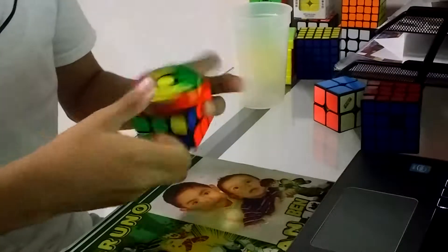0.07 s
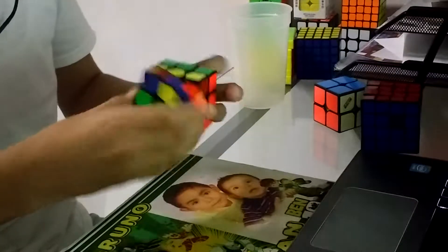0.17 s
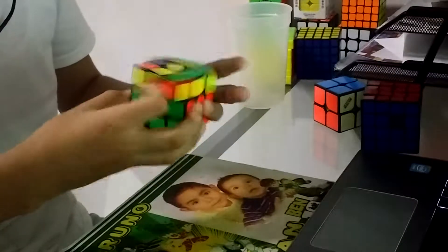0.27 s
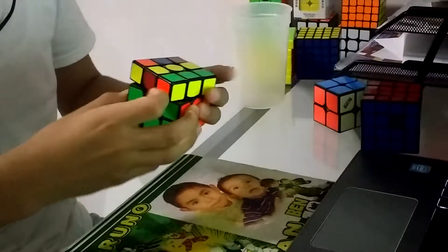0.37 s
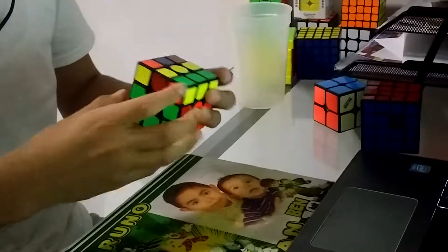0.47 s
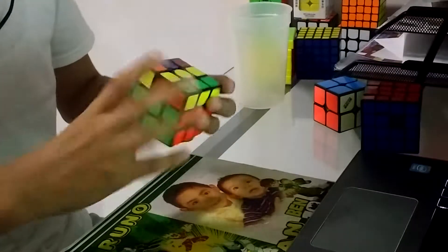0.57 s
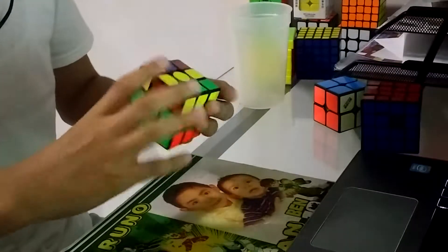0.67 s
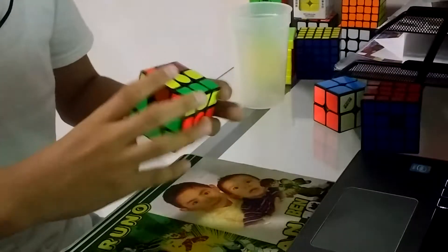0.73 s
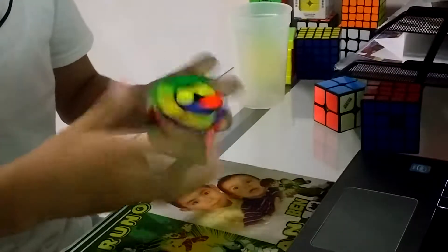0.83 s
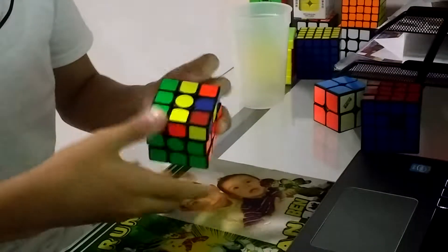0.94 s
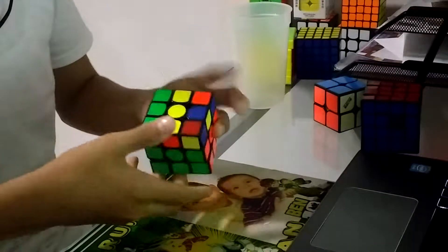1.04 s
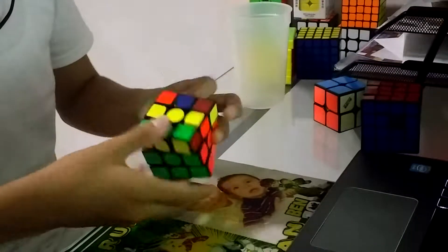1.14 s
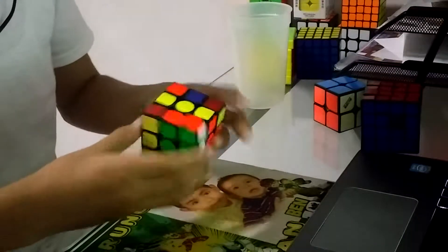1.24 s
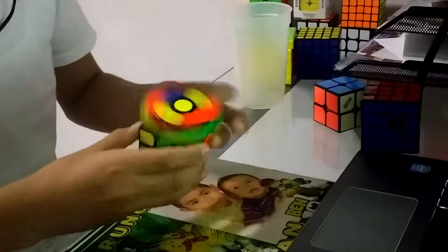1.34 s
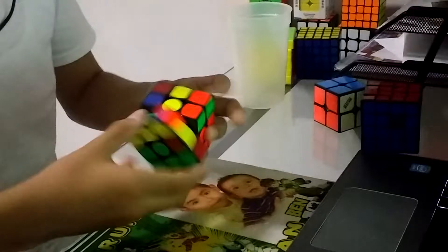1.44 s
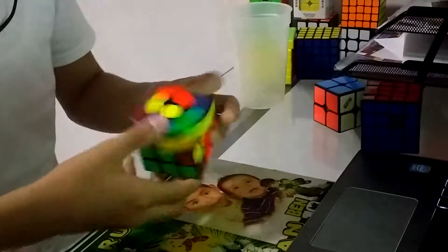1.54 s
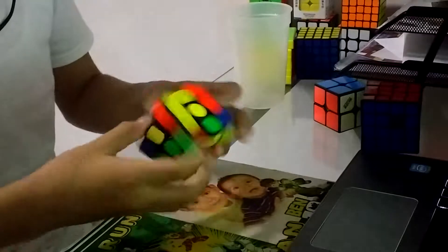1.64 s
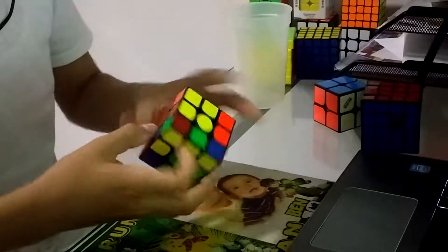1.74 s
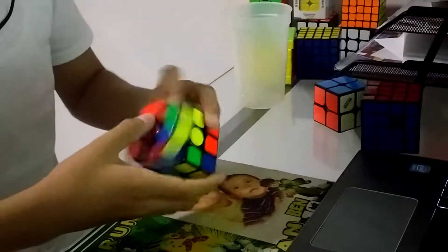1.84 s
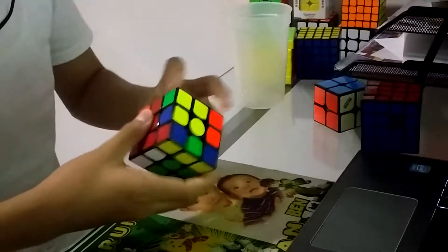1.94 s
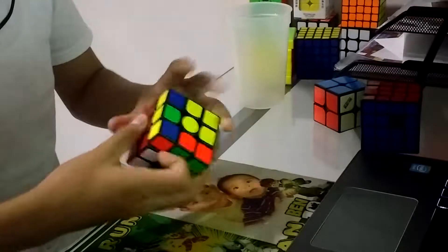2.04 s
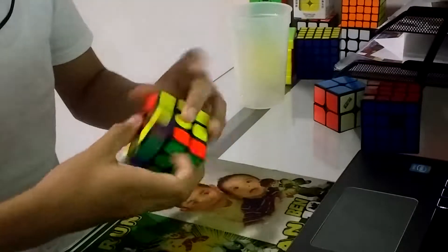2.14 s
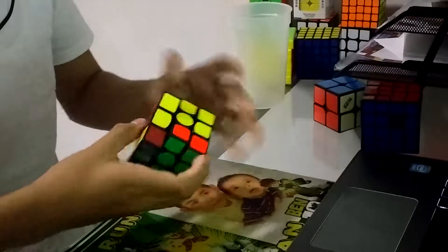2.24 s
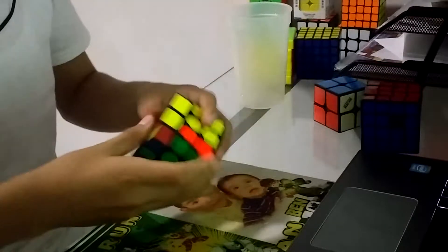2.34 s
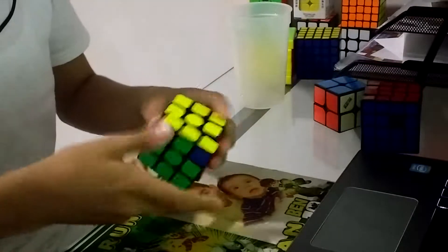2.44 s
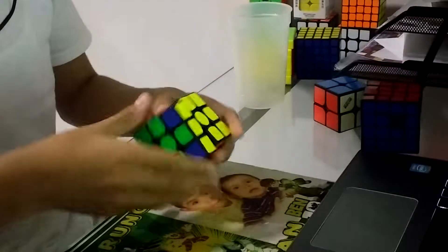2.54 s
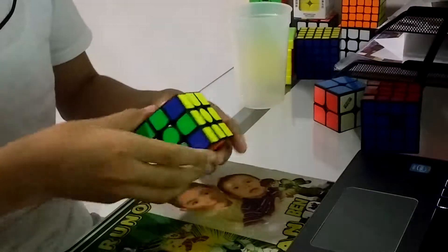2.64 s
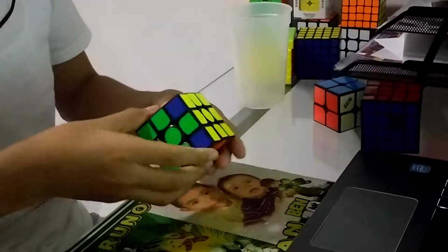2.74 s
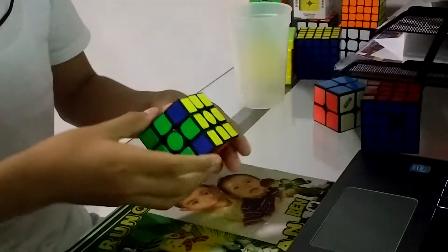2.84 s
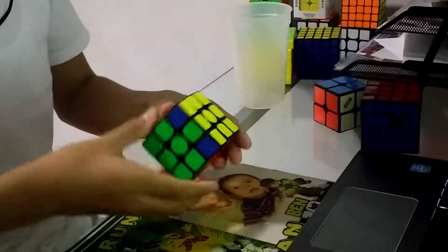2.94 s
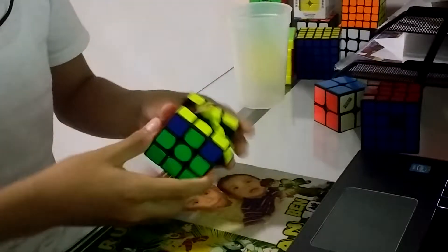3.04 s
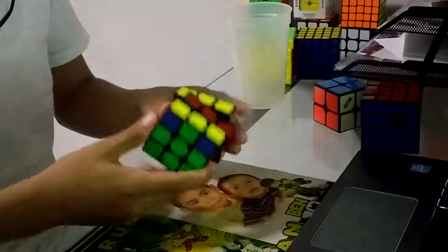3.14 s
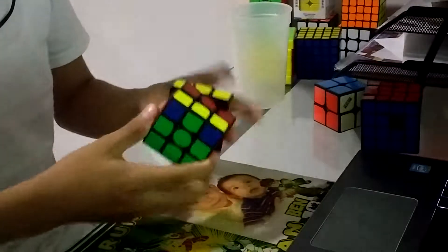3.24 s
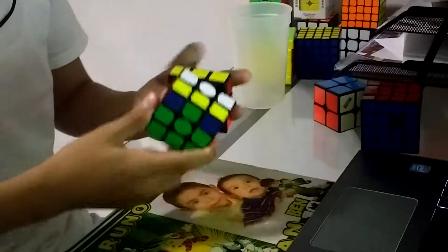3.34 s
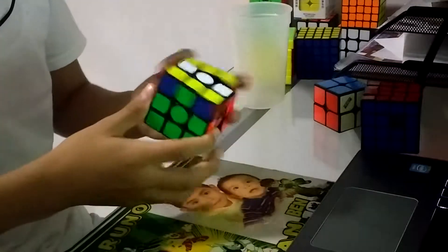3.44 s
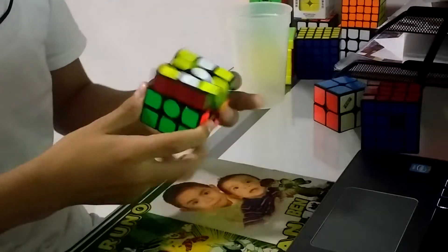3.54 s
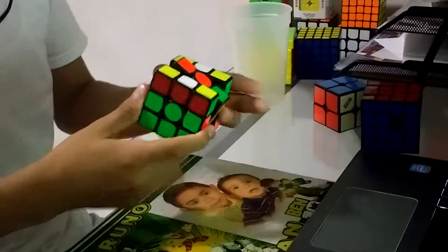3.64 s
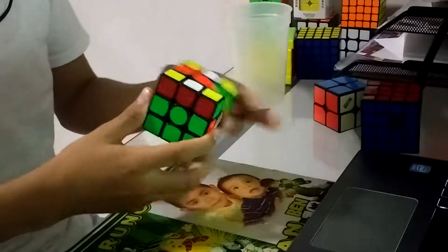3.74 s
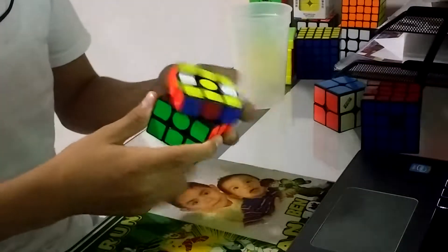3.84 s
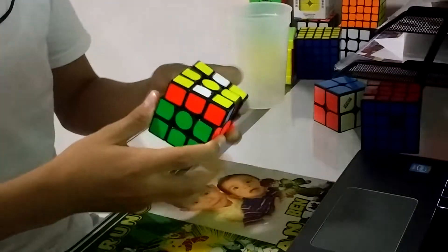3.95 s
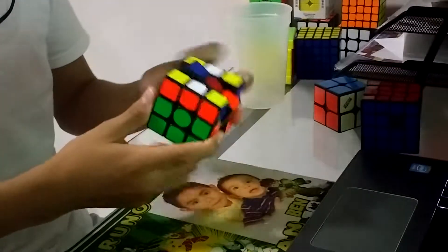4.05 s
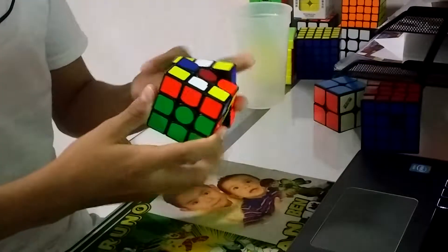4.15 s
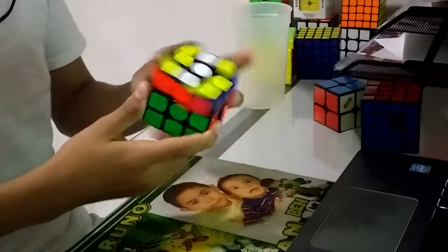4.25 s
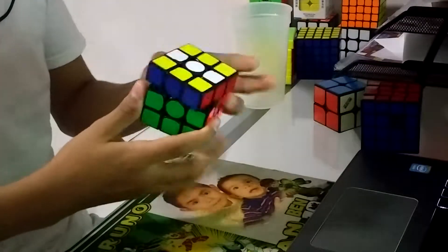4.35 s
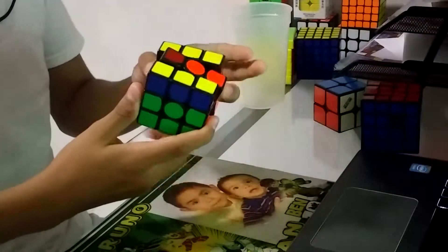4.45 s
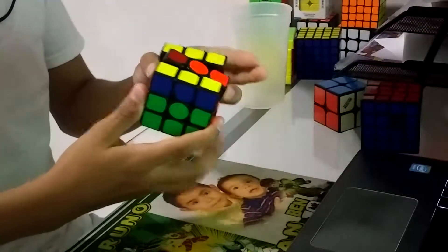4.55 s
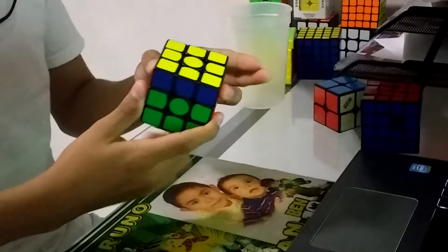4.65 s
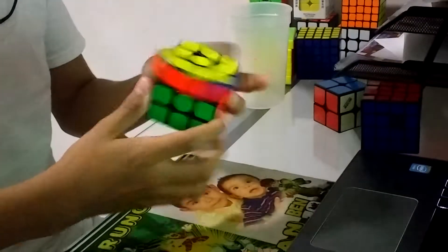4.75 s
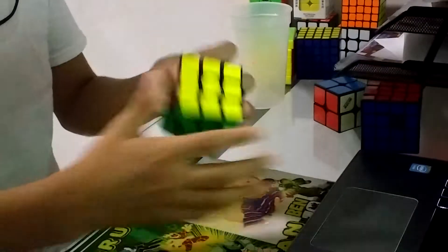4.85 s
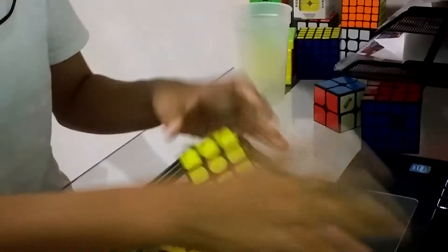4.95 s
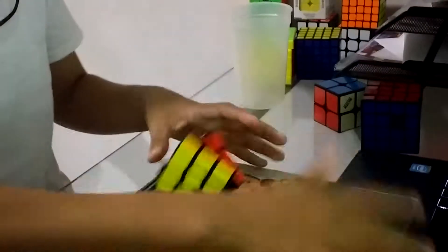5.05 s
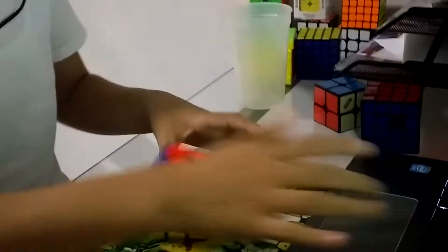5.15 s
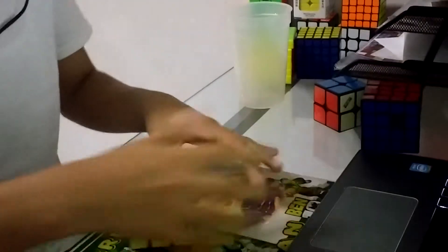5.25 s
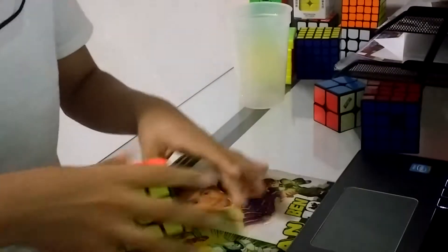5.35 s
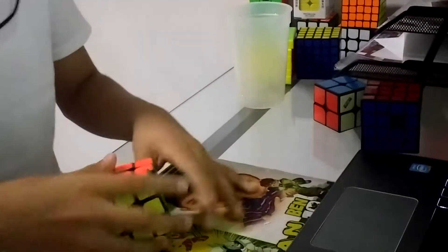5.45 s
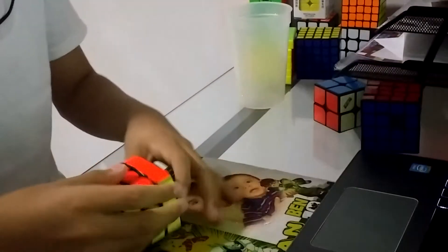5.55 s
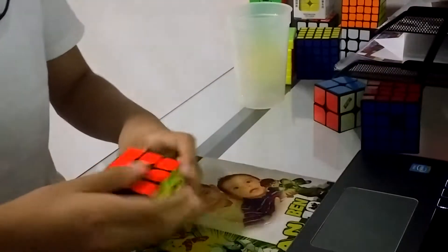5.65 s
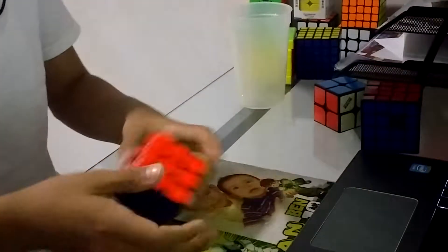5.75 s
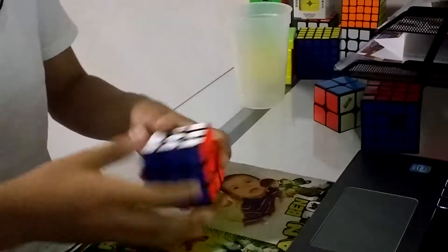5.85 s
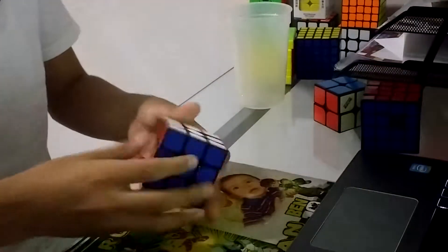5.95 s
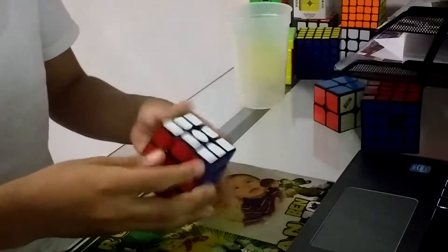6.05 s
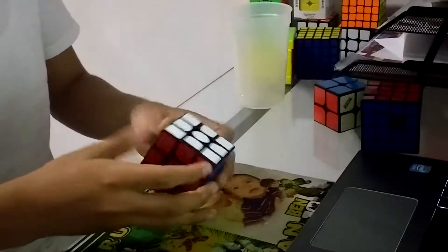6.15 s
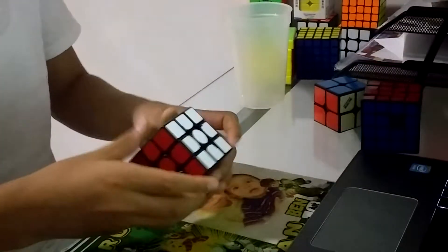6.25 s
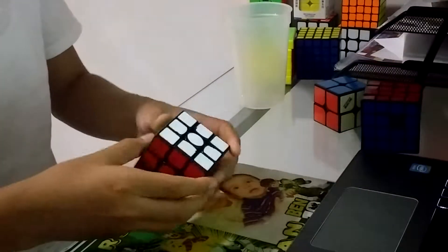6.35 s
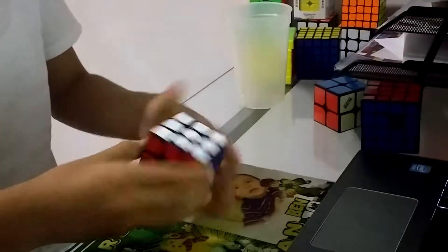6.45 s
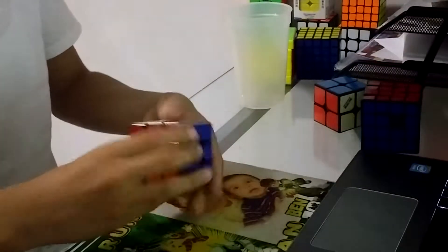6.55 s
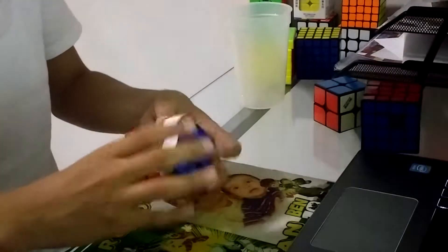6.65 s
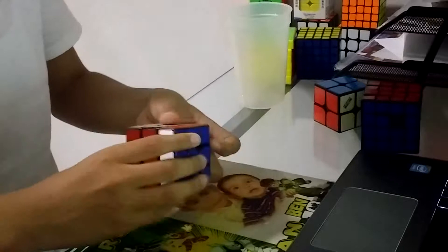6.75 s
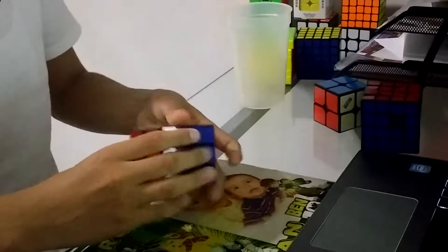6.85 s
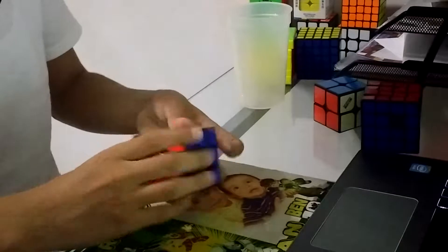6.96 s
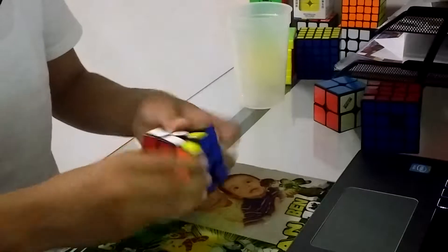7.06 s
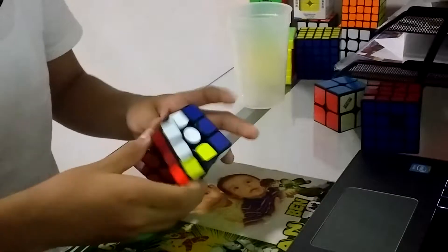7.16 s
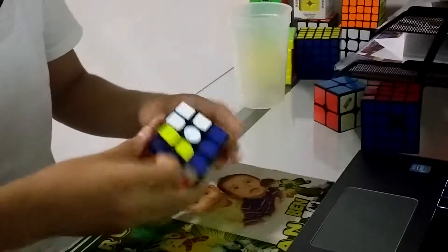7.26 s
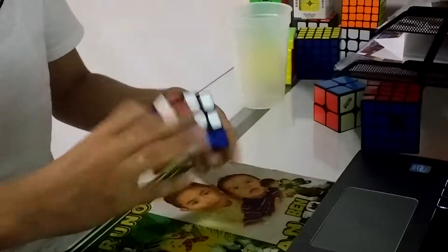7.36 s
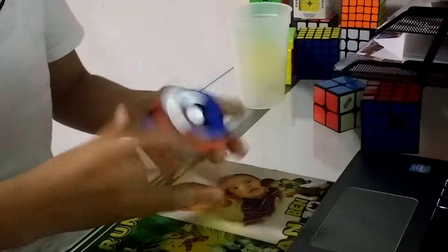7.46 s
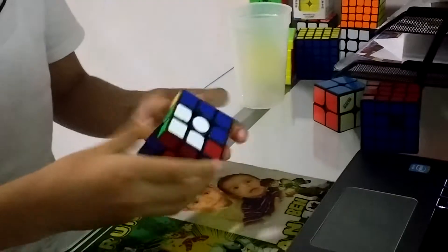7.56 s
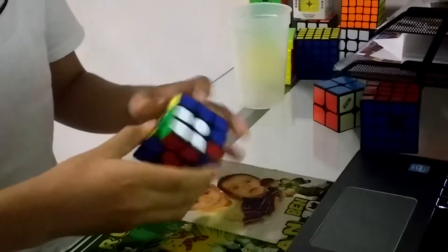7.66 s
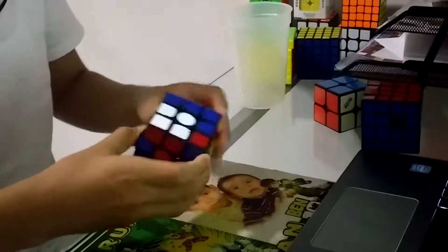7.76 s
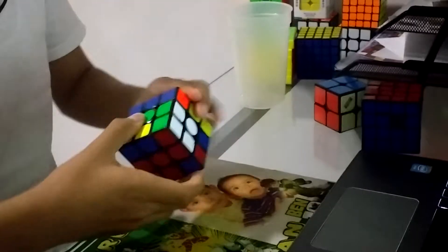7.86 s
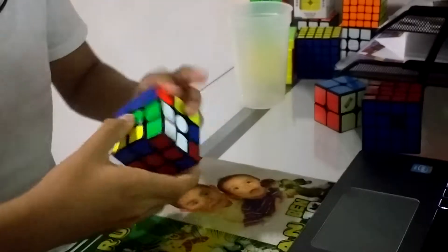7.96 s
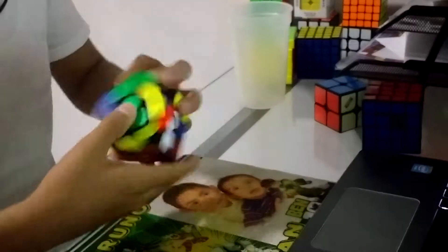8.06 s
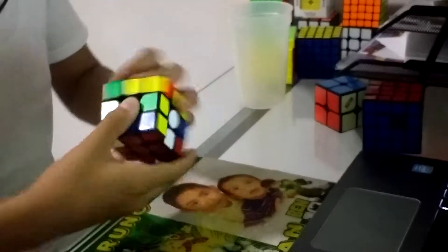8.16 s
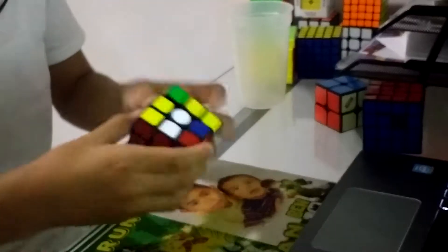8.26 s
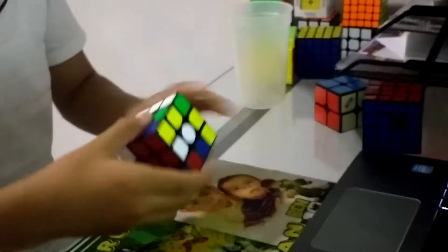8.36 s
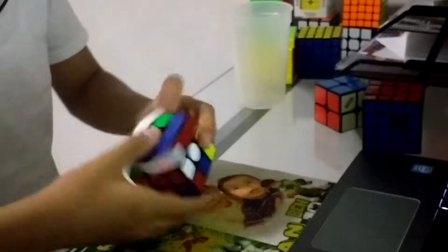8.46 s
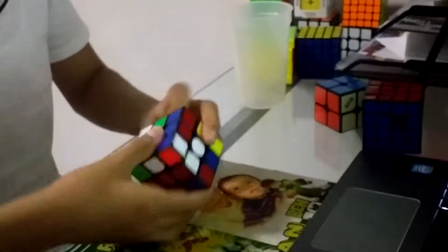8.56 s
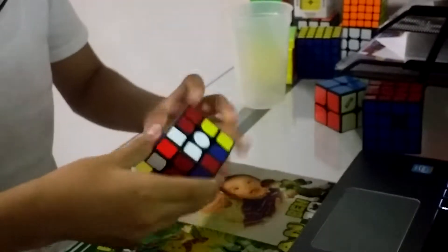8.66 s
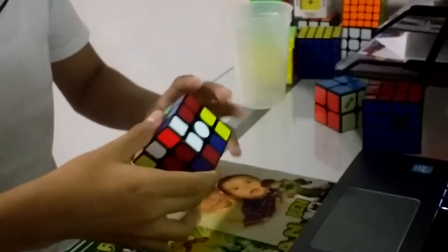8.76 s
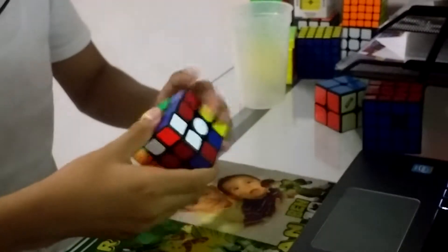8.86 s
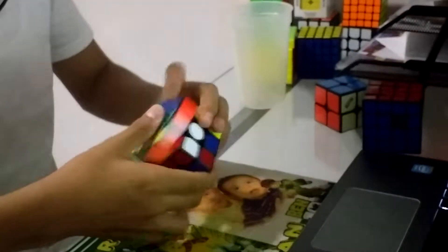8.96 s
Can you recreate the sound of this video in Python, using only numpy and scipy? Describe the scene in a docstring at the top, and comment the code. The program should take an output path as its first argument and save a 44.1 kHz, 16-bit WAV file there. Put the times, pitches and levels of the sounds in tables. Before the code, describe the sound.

A plastic puzzle cube is worked fast by hand close to a wide stereo microphone in a small hard room. From 0 to 0.3 s a tight flurry of snaps and sliding rattles, a gap, then dense clicks from 0.8 to 2.4 s, strongest around 1.2 to 1.5. A pause follows until about 3.1 s, then sharp clusters to 4.8 s, with hard snaps near 3.6, 4.0 and 4.4. At 5.0 s the cube drops on the desk: a bright clack with a short low thud, then weaker bumps to 5.3. Faint finger ticks and handling fill the lull, with a soft bump near 6.5. From 6.65 s turning resumes in short clacking bursts with pauses until 9 s. Rumble, hum and hiss swell and dip beneath, with soft low tones and tiny thin whines.

```python
"""A plastic puzzle cube is turned fast by hand at a desk in a small hard room. Each snap or finger tick is a noise
puff ringing its walls, edges and inner air; sliding layers are lumpy noise through the same resonances. The cube is
dropped on the desk, whose blows are fading low tones and noise. Thin whines and soft low tones come and go, over a
rumble, hum and hiss that swell and dip. Two microphone ports are cross-subtracted into a wide stereo pair."""
import sys
import numpy as np
from scipy import signal
from scipy.fft import rfft, irfft, next_fast_len
from scipy.io import wavfile
from scipy.ndimage import map_coordinates

SR = 44100
rng = np.random.default_rng(int(sys.argv[2]) if len(sys.argv) > 2 else 0)


def bounce(signal):
    """Save signal as a 16-bit WAV file at the path given by the first command-line argument."""
    frames = np.transpose(np.atleast_2d(signal))
    limited = np.clip(frames, -1, 1)
    pcm = np.round(limited * 32767).astype(np.int16)
    wavfile.write(sys.argv[1], SR, pcm)


N = 397341

# Pieces snap into line; the faint rows from 5.4 to 6.6 s are small finger ticks. Each row: peak time in seconds,
# base level in dB, hollow clack in dB over that level; the shares of walls, edges and air below are added to these.
CLICKS = [(0.0089, -18, -9.5), (0.055, -20, -12), (0.073, -18, -6.5), (0.112, -17, -8.5), (0.1184, -30, -1),
          (0.17, -20, -8.5), (0.1778, -21, -11), (0.2753, -23, -18), (0.2895, -22.5, -1.5),
          (0.8115, -21.5, -7), (0.8213, -24.5, 2.5), (0.8659, -16, -14), (0.8744, -22.5, -1),
          (1.0201, -18.5, -14), (1.1391, -22, -4), (1.1499, -25, 0.5), (1.1636, -18.5, -10),
          (1.2178, -12.5, -9.5), (1.226, -15, -10), (1.2538, -25.5, -11), (1.3552, -22.5, -10),
          (1.3723, -13, -8), (1.4542, -13.5, -10), (1.566, -19, -13), (1.6275, -27.5, -2.5),
          (1.6867, -15.5, -12), (1.8546, -31, -2), (2.0219, -27.5, -18), (2.0471, -38, -13),
          (2.0648, -25, -13), (2.135, -29, 0.5), (2.1475, -19, -20), (2.1687, -30, -18), (2.1893, -29, -18),
          (2.396, -28.5, 3), (2.412, -15.5, -10), (2.4395, -17.5, -14), (3.0738, -19, -30),
          (3.1141, -21, -7), (3.2925, -37, -6), (3.3238, -21, -1), (3.3321, -15, -7.5), (3.3449, -19.5, -5),
          (3.4965, -40.5, 13.5), (3.5094, -20, -0.5), (3.5216, -19.5, -4), (3.5362, -18, -11),
          (3.5913, -14.5, -6.5), (3.5968, -11.5, -12.5), (3.8158, -24.5, -4), (3.8363, -26, -8),
          (3.8513, -17.5, -17), (3.8665, -22, -7), (3.8913, -20.5, -23), (3.934, -24, -24),
          (4.006, -21, -14), (4.0166, -9, -19), (4.0302, -19, -10), (4.2113, -25, -8), (4.2967, -28, -15),
          (4.3109, -20, -11), (4.4362, -10, -12.5), (4.6307, -27, -8), (4.7619, -32.5, -5),
          (4.9871, -14, -3), (4.9931, -12.5, -9), (5.0305, -27, -1.5), (5.2203, -42, 9), (5.422, -54.5, 6),
          (5.461, -56, 3), (5.6355, -54, -13), (5.885, -56, -15), (5.984, -45.5, 7.5), (6.0145, -42, -2),
          (6.113, -42, -2), (6.1805, -44, -15), (6.236, -46, -13), (6.596, -42, 4), (6.6621, -22.5, 2.5),
          (6.6758, -30, 5.5), (6.6847, -21, -6), (6.6907, -25, -8), (6.7215, -24, 6), (6.7344, -14.5, -15),
          (6.837, -34.5, -11), (6.9945, -31.5, -14), (7.1185, -29, -7), (7.1809, -21.5, -17),
          (7.2436, -26, -8), (7.2531, -17.5, -8), (7.3408, -27, -7), (7.3672, -38, -13), (7.489, -17, -13),
          (7.827, -27.5, -7), (8.0148, -32, -19), (8.0206, -23.5, -3.5), (8.0407, -15, -7.5),
          (8.2322, -29.5, -3.5), (8.4688, -26.5, -1.5), (8.4836, -29, 2.5), (8.4919, -27, 2.5),
          (8.651, -23, -1), (8.6667, -22, 3), (8.6885, -17, -14), (8.881, -23, -4), (8.993, -21, -6),
          (8.9997, -19.5, -15)]
# Layer turns, and one stretch of very quiet handling from 5.984 s. Each row: start in seconds, end in seconds,
# sliding faces in dB, hollow body in dB.
RUBS = [(0, 0.182, -43.5, -42), (0.259, 0.316, -46, -41.5), (0.402, 0.435, -56.5, -54),
        (0.784, 0.884, -53, -43), (1.004, 1.037, -58, -62), (1.105, 1.246, -51, -41),
        (1.332, 1.378, -45, -42.5), (1.435, 1.468, -52, -41), (1.54, 1.578, -48.5, -40),
        (1.62, 1.72, -54, -46), (1.821, 1.885, -50.5, -47), (1.992, 2.063, -50, -48),
        (2.139, 2.185, -40, -37), (2.381, 2.459, -39.5, -47.5), (3.056, 3.113, -46.5, -40),
        (3.286, 3.355, -47.5, -46), (3.486, 3.626, -41, -53), (3.787, 3.926, -43, -46.5),
        (3.987, 4.034, -44.5, -42.5), (4.189, 4.232, -45.5, -44), (4.285, 4.335, -48, -47.5),
        (4.402, 4.461, -44, -45.5), (4.593, 4.631, -50, -56), (4.743, 4.843, -50.5, -48.5),
        (4.996, 5.07, -74, -64), (5.198, 5.236, -56.5, -48), (5.984, 6.64, -91, -77),
        (6.635, 6.748, -49.5, -46), (6.934, 6.983, -55.5, -50.5), (7.089, 7.273, -48, -50.5),
        (7.316, 7.377, -47, -44.5), (7.467, 7.506, -48.5, -43.5), (7.736, 7.75, -57, -59),
        (7.805, 7.864, -50.5, -45), (7.988, 8.109, -50, -46.5), (8.201, 8.234, -50.5, -43),
        (8.401, 8.46, -63, -52), (8.46, 8.504, -46.5, -51), (8.65, 8.726, -49.5, -44),
        (8.854, 8.925, -46, -43.5), (8.956, 9.003, -45, -41.5)]
# Air inside the cube. Each row: pitch in Hz, width in Hz, relative level in dB.
HOLLOW = [(846, 1300, -7), (1080, 194, -0.5), (1492, 63, -1.5), (1624, 41, 5), (2180, 950, -3.5)]
# Walls of the pieces. Each row: pitch in Hz, width in Hz, relative level in dB.
SHELL = [(2740, 260, 2), (4575, 1300, -2), (6420, 2800, -6)]
# Thin edges of the pieces. Each row: pitch in Hz, width in Hz, relative level in dB.
EDGE = [(8100, 2750, -5), (11600, 1260, -7), (14750, 4100, -4.5)]
# Blows on the desk. Each row: start in seconds, level in dB before the desk's own shares.
THUDS = [(4.984, -16.5), (4.994, -34), (5.146, -36), (5.2118, -31), (5.27, -41), (5.979, -48), (6.486, -30)]
# Low tones of the desk top. Each row: pitch in Hz, relative level in dB, time to fall 60 dB in seconds.
DESK = [(121.9, -1, 0.4), (133.4, -7, 0.5), (185, -7, 0.34), (212.7, 7.5, 0.041), (262, -10, 0.36),
        (349, -14, 0.24)]
# Higher desk tones, too crowded to ring singly. Each row: pitch in Hz, width in Hz, relative level in dB.
KNOCK = [(287, 99, 1.5), (440, 430, -2.5), (706, 480, -3.5), (1017, 490, -9)]
# Thin high whines. Each row: start in seconds, length in seconds, level in dB of each tone before the port shares.
WHINES = [(2.681, 0.017, -55.5), (2.82, 0.0092, -55), (3.0, 0.011, -52), (5.88, .015, -62),
          (6.112, .012, -60), (6.198, .018, -58), (6.508, .09, -61)]
# The tones of a whine. Each entry: pitch in Hz.
WHINE_HZ = [13000, 14000, 15000]
# Low tones that come and go. Each row: start in seconds, end in seconds, middle pitch in Hz, middle level in dB.
TONES = [(0.294, 0.705, 882, -61.5), (2.077, 2.422, 348, -53.5), (2.756, 3.138, 124, -47.5),
         (3.213, 4.902, 563, -62.5), (3.397, 4.195, 212, -62.5), (6.33, 6.74, 538, -53),
         (7.698, 8.1, 124, -53), (8.094, 8.507, 141, -51), (8.176, 8.297, 330, -46.5),
         (8.308, 8.83, 346, -50), (8.405, 8.707, 235, -51.5) ]
# How long the room rings. Each row: pitch in Hz, time to fall 60 dB in seconds.
ROOM = [(700, 0.38), (5000, 0.44), (14000, 0.34)]
# Background before the dips. Each row: time in seconds, rumble in dB, hum in dB, hiss in dB.
BACKGROUND = [(0, -56, -49, -48), (1, -46.5, -49.5, -47.5), (1.6, -59, -49.5, -54), (2.2, -41, -47, -44),
              (2.8, -52, -51, -47.5), (3.5, -62, -51.5, -48), (4.2, -52, -60, -48.5), (5, -55, -58, -54.5),
              (6, -50.5, -58, -55.5), (6.6, -49, -50, -48), (7.3, -65, -59, -52.5), (8, -69, -58, -49),
              (8.4, -63, -54, -46.5), (9.01, -65, -53, -46)]
# Colour of the rumble. Each row: pitch in Hz, relative level in dB per Hz.
RUMBLE = [(33, -32), (38, -27), (46, 40.5), (56, 15), (75, -4), (100, -25)]
# Fuzzy hum tones. Each row: middle pitch in Hz, width in Hz, relative level in dB.
HUM = [(125.4, 8.7, 0.5), (181.8, 14, -4.5), (220.8, 5.3, 0)]
# Weaker fuzzy tone above the hum. Each row: middle pitch in Hz, width in Hz, relative level in dB.
DRONE = [(524.6, 54, 0)]
# Colour of the hiss. Each row: pitch in Hz, relative level in dB per Hz.
HISS = [(80, -1.5), (200, -0.5), (600, -2.5), (1000, -6), (2400, -11), (4000, -18), (8000, -23.5),
        (15000, -26)]
# Sudden drops of the background and room tails. Each row: time in seconds, depth in dB.
DIPS = [(0, 14), (1.219, 11), (2.442, 5.5), (3.598, 14.5), (4.018, 6), (4.439, 3), (4.989, 3), (6.737, 11)]
# Share of the other port taken away. Each row: pitch in Hz, share as a plain factor.
CROSS = [(300, 0.067), (1200, 0.73), (2000, 0.51), (2480, 0.9), (3000, 0.41), (3700, 0.34), (5000, 0.47),
         (7500, 0.43), (9000, 0.4), (11500, .08)]
# Colour of the two ports. Each row: pitch in Hz, left in dB, right in dB.
PORTS = [(100, 0, 2), (1070, -1.56, -0.32), (9360, 1.5, 3), (12300, -6, 2.5), (14100, -12, -0.5)]

# Shares of a click: wide (low) walls, narrow (high) walls, edges and air.
WIDE_DB, NARROW_DB, EDGE_DB, AIR_DB = -12, -9.5, -14.5, -6.5
WALL_SPREAD_DB, EDGE_SPREAD_DB = 2.5, 2.5  # wide walls shift with the pieces that meet; edges vary too
# Small chance ticks in each rub: level over the sliding faces, clack over the tick, growth over the rub, scatter.
TICKS_PER_S, TICK_DB, TICK_CLACK_DB, TICK_RISE_DB, TICK_SPREAD_DB = 45, 14.5, -5.5, 6, 2.5
CREEP_S = 0.73  # time constant of the return after a dip
TOP_HZ = 15550  # upper end of the sound
PORT_DELAY_S = 0.0004037


def amp(db):
    """Turn dB into a plain factor."""
    return 10 ** (np.asarray(db) / 20)


def unit(x):
    """Scale to an average (RMS) strength of 1."""
    return x / np.sqrt(np.mean(x ** 2) + 1e-20)


def along(points, hz, axis=1):
    """Read one column of (Hz, value, ..) points on a log pitch axis."""
    cols = np.transpose(points)
    return np.interp(np.log(hz + 1), np.log(cols[0] + 1), cols[axis])


def curves(rows):
    """Draw one value per sample for each column after the time."""
    s, *cols = np.transpose(rows)
    return [np.interp(np.arange(N) / SR, s, c) for c in cols]


def wobble(rate):
    """Draw a smooth random curve with rate knots a second."""
    knots = rng.standard_normal(int(N * rate / SR) + 4)
    return map_coordinates(knots, [np.arange(N) * rate / SR])


def filtered(x, response):
    """Shape x by a response that depends on pitch."""
    m = next_fast_len(N + SR // 2)
    return irfft(rfft(x, m) * response(np.fft.rfftfreq(m, 1 / SR)), m)[..., :N]


def resonant(x, modes):
    """Ring x through (Hz, width, dB) resonances, scaled so that white noise keeps its level."""
    def ring(f):
        total = 0
        for k, (hz, width, db) in enumerate(modes):
            peak = 1j * f * width / (hz * hz - f * f + 1j * f * width)
            total = total + (-1) ** k * amp(db) * peak
        return total

    noise_gain = np.sqrt(np.mean(abs(ring(np.linspace(0, SR / 2, num=2000))) ** 2))
    return filtered(x, ring) / noise_gain


def mix_ports(shared, own, alike):
    """Blend shared and opposite noise so that the two ports are as alike as asked."""
    turn = np.arccos(np.clip(alike, -1, 1)) / 2
    return np.cos(turn) * shared + np.sin(turn) * np.array([own, -own])


def pair(alike):
    """Make steady noise at the two ports, partly shared."""
    shared, own = rng.standard_normal((2, N))
    return mix_ports(shared, own, alike)


def bursts(times, db, rise, t60, alike):
    """Noise puffs swell to a peak and die; each port hears its own face of the object."""
    lead = SR // 100  # samples before the peak
    out, t = np.zeros((2, N + SR)), np.arange(-lead, SR // 20) / SR
    shape = np.where(t < 0, np.exp(np.minimum(t, 0) / rise), amp(-60 * t / t60))
    noises = rng.standard_normal((len(times), 2, len(t)))
    for s, gain, (shared, own) in zip(times, amp(db), noises):
        out[:, round(s * SR):][:, :len(t)] += gain * shape * mix_ports(shared, own, alike)
    return out[:, lead:][:, :N]


def clicks():
    """Each snap or tick shakes the walls and edges briefly and the enclosed air a little longer."""
    s, db, clack_db = np.transpose(CLICKS + ticks())
    scatter = rng.standard_normal((len(s), 2))
    edge_db = EDGE_DB + EDGE_SPREAD_DB * scatter[:, 0]
    wall_db = WIDE_DB + WALL_SPREAD_DB * scatter[:, 1]
    wide = resonant(bursts(s, db + wall_db, rise=0.00084, t60=0.02, alike=0.047), SHELL[:2])
    narrow = resonant(bursts(s, db + NARROW_DB, rise=0.001, t60=0.015, alike=0.12), SHELL[2:])
    edges = resonant(bursts(s, db + edge_db, rise=0.003, t60=0.021, alike=0.56), EDGE)
    air = resonant(bursts(s, db + clack_db + AIR_DB, rise=0.0019, t60=0.044, alike=0.28), HOLLOW)
    return wide + narrow + edges + air


def ticks():
    """Scatter small uneven ticks through every rub, growing towards its end; rows are like CLICKS."""
    rows = []
    for start, end, faces_db, _ in RUBS:
        length = end - start
        for place, chance in rng.random((round(TICKS_PER_S * length), 2)):
            growth_db = -TICK_RISE_DB * (1 - place)
            size_db = -TICK_SPREAD_DB * np.log(1 - chance)  # mostly small, now and then large
            rows.append((start + length * place, faces_db + TICK_DB + growth_db + size_db, TICK_CLACK_DB))
    return rows


def scrape():
    """Sliding faces catch and let go: noise in tiny uneven lumps drives the cube's resonances during each rub."""
    t = np.arange(N) / SR
    # Each rub fades in over 12 ms and out over 25 ms after its end.
    rubbing = [np.clip(np.minimum((t - start) / 0.012, (end - t) / 0.025 + 1), 0, 1)
               for start, end, *_ in RUBS]
    faces, body = amp(np.transpose(RUBS)[2:]) @ rubbing
    lumps = amp(2.5 * wobble(260) + 1.5 * wobble(60))

    def rub(strength):
        return strength * unit(lumps * pair(alike=0.02))

    walls = resonant(rub(faces), SHELL)
    edges = amp(-6.0) * resonant(rub(faces), EDGE)
    return walls + edges + resonant(rub(body), HOLLOW)


def thuds():
    """The struck desk rings low tones, mixed anew for each spot, after a soft start, and rattles above."""
    out, t = np.zeros(N + SR), np.arange(SR // 2) / SR
    soft_start = 1 - np.exp(-t / 0.0021)
    spots_db = 1.4 * rng.standard_normal((len(THUDS), len(DESK)))
    for (s, db), spot_db in zip(THUDS, spots_db):
        ring = 0
        for (hz, level, t60), spot in zip(DESK, spot_db):
            ring = ring - amp(level + spot - 60 * t / t60) * np.sin(2 * np.pi * hz * t)
        out[round(s * SR):][:len(t)] += amp(db - 5.5) * ring * soft_start
    low = out[:N] * amp([[-.6], [.6]])  # the ports shake unequally: dB left, right
    s, db = np.transpose(THUDS)
    rattle = bursts(s + 0.0018, db - 11, rise=0.0021, t60=0.25, alike=0.39)
    return low + resonant(rattle, KNOCK)


def room(x, chunk=SR // 6):
    """Walls answer each port with a tail that dies band by band; moving hands renew it every sixth of a second."""
    out = np.zeros((2, N + 2 * SR))
    for start in range(0, N, chunk):
        hz, t, z = signal.stft(rng.standard_normal((2, SR // 2)), SR, nperseg=256)
        fade = amp(-60 * t / along(ROOM, hz)[:, None])
        tail = signal.istft(z * fade, SR, nperseg=256)[1]
        wet = signal.fftconvolve(x[:, start:start + chunk], tail / np.linalg.norm(tail[0]), axes=1)
        out[:, start + 120:][:, :wet.shape[1]] += wet  # 120 samples late, about 2.7 ms
    return out[:, :N]


def whine():
    """Three thin pure tones blip on together."""
    t = np.arange(N) / SR
    gate = sum(amp(db) * np.clip(np.minimum(t - s, s + length - t) / .003, 0, 1) for s, length, db in WHINES)
    return gate * sum(np.sin(2 * np.pi * hz * t) for hz in WHINE_HZ)


def tones():
    """Soft low pure tones fade in and out while their pitch and level waver slightly."""
    t, out = np.arange(N) / SR, 0
    for start, end, hz, db in TONES:
        level = amp(db + 1.5 * wobble(6))
        fade = np.clip(np.minimum(t - start, end - t) / 0.051, 0, 1)
        pitch = hz * (1 + 0.00734 * wobble(7))
        out = out + level * fade * np.sin(2 * np.pi * np.cumsum(pitch) / SR)
    return out


def background():
    """Filtered noise makes rumble, wavering hum and hiss, each swelling and dipping."""
    rumble_db, hum_db, hiss_db = curves(BACKGROUND)
    rumble = unit(filtered(pair(alike=0.15), lambda hz: amp(along(RUMBLE, hz))))
    hum = unit(resonant(pair(alike=0.81), HUM))
    drone = unit(resonant(pair(alike=1.0), DRONE))
    hiss = unit(filtered(pair(alike=0.35), lambda hz: amp(along(HISS, hz))))
    hiss_and_drone = hiss + amp(-4.5) * drone  # these swell together
    return amp(rumble_db) * rumble + amp(hum_db) * hum + amp(hiss_db) * hiss_and_drone


def dips():
    """The level drops at once at each listed moment and creeps back; overlapping dips add up in dB."""
    t = np.arange(N) / SR
    depth = sum(db * (t >= s) * np.exp(-np.maximum(t - s, 0) / CREEP_S) for s, db in DIPS)
    return amp(-depth)


def scene():
    """Add all sounds at the two ports; only the room tails and the background follow the dips."""
    level = dips()
    cube = clicks() + scrape()
    # Raise the cube first, so that only the later change of level alters its tails.
    tails = amp(-1.83) * room(cube / level)
    whine_ports = whine() * np.array([[.3], [1]])  # weaker at the left
    return cube + level * (tails + background()) + thuds() + tones() + whine_ports


def record(dry):
    """Each port loses a delayed copy of the other; bass is lifted back, sides are coloured, both ends are cut."""
    def cross(hz):
        return np.clip(along(CROSS, hz), 0, .95) * np.exp(-2j * np.pi * hz * PORT_DELAY_S)

    def colour(hz):
        # Undo the loss for sound shared by both ports; above 1200 Hz the lift stays the same.
        lift = 1 / np.minimum(abs(1 - cross(np.minimum(hz, 1200))), 1)
        bass_cut = (1j * hz / (1j * hz + 30)) ** 4
        sides = amp([along(PORTS, hz, axis=1), along(PORTS, hz, axis=2)])
        return sides * lift * bass_cut / (1 + (hz / TOP_HZ) ** 120)

    wide = dry - filtered(dry[::-1], cross)
    return filtered(wide, colour)


dry = scene()
out = record(dry)
bounce(out)
```